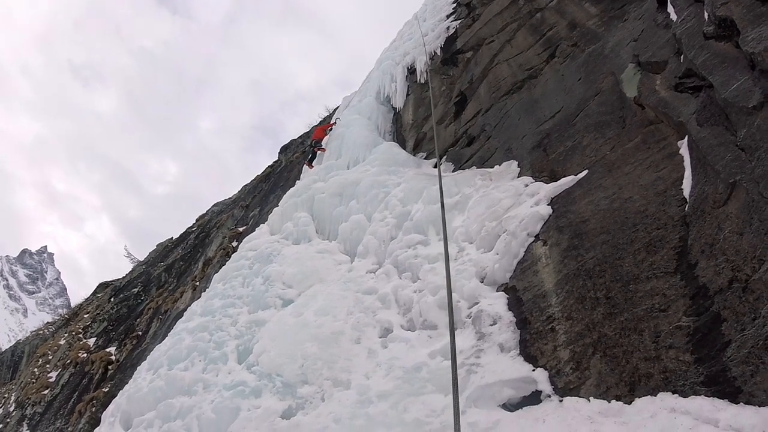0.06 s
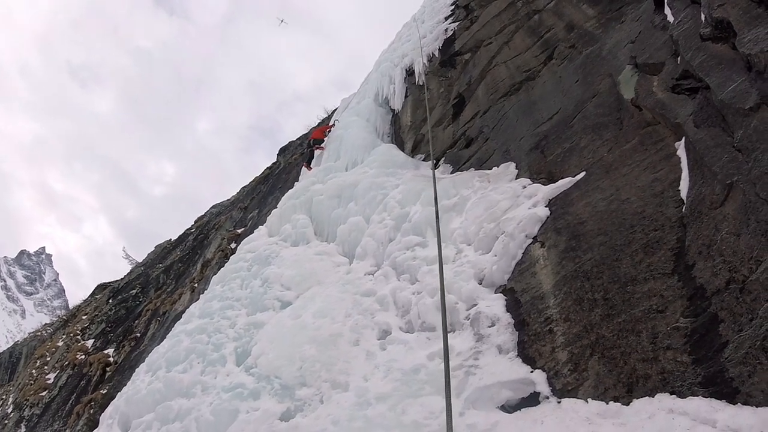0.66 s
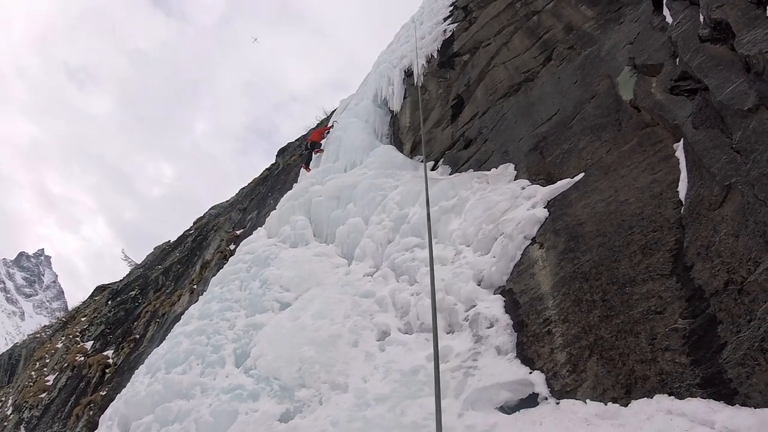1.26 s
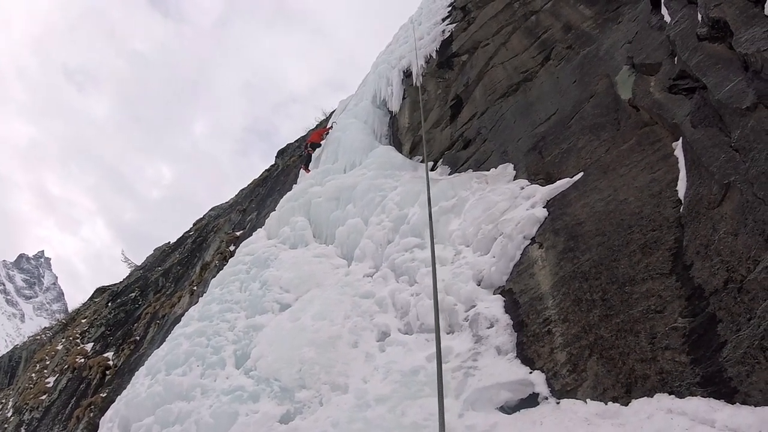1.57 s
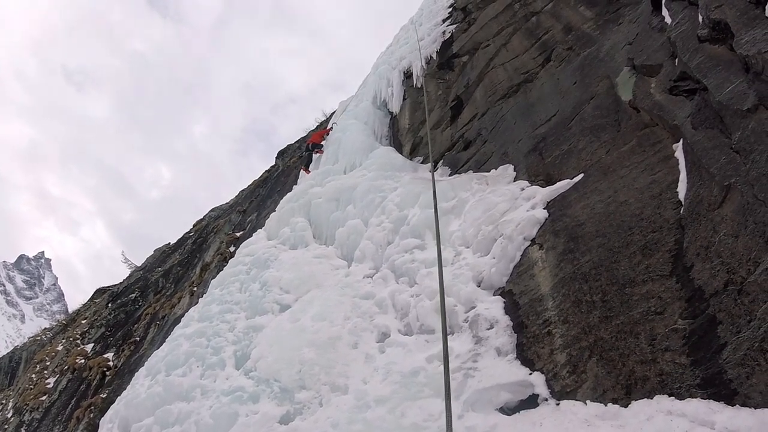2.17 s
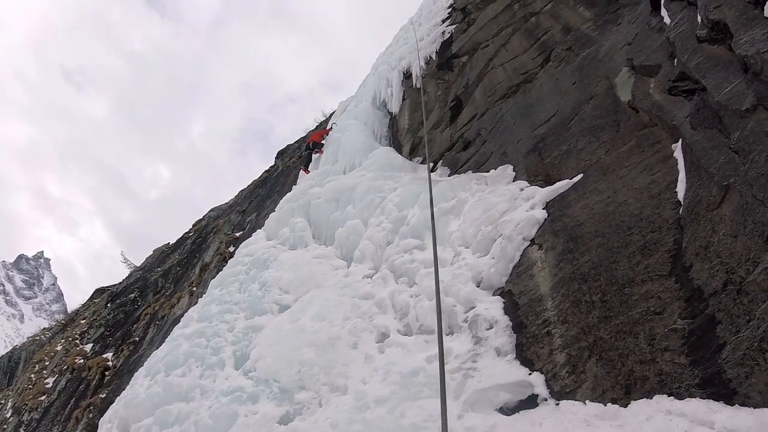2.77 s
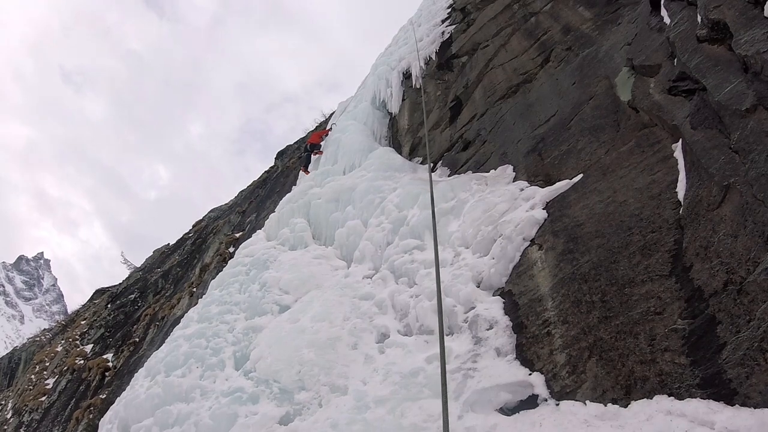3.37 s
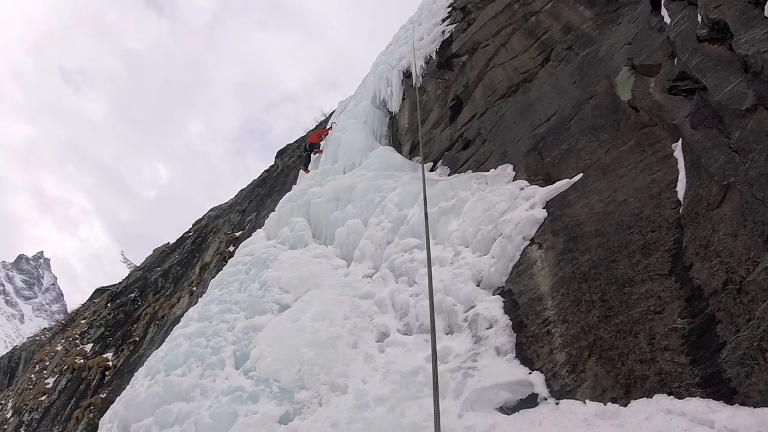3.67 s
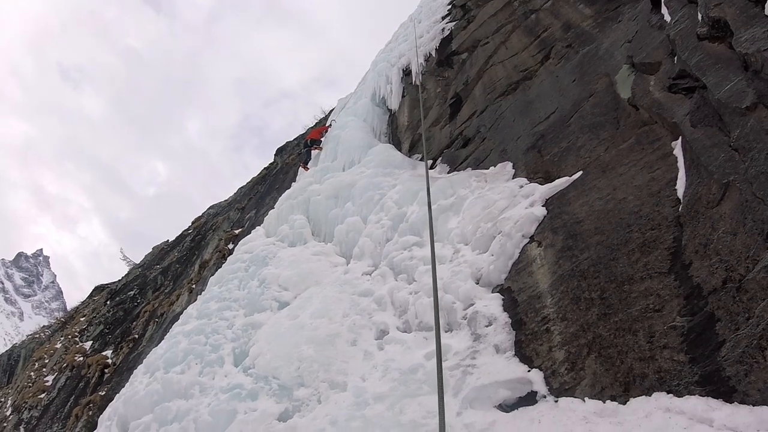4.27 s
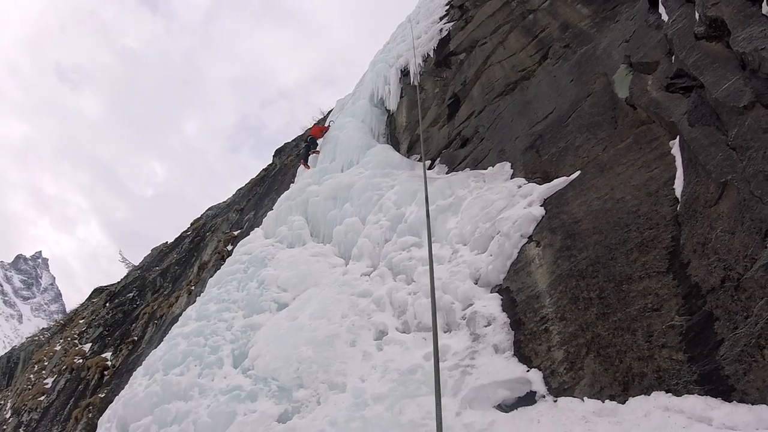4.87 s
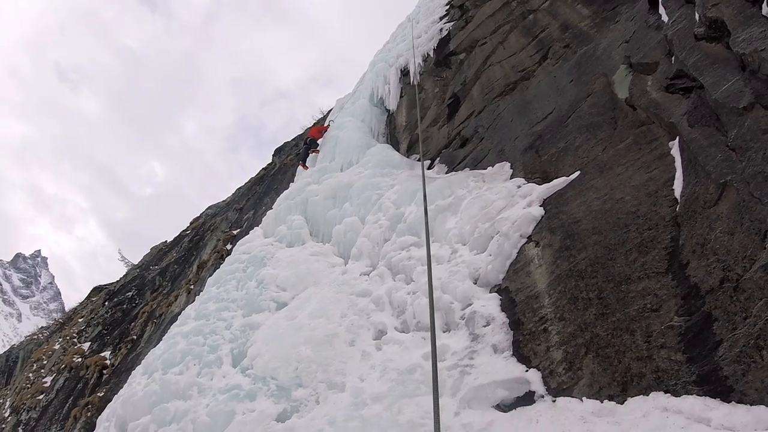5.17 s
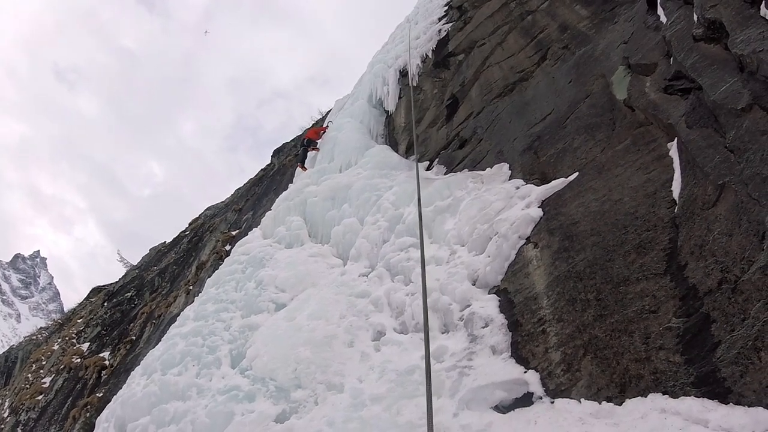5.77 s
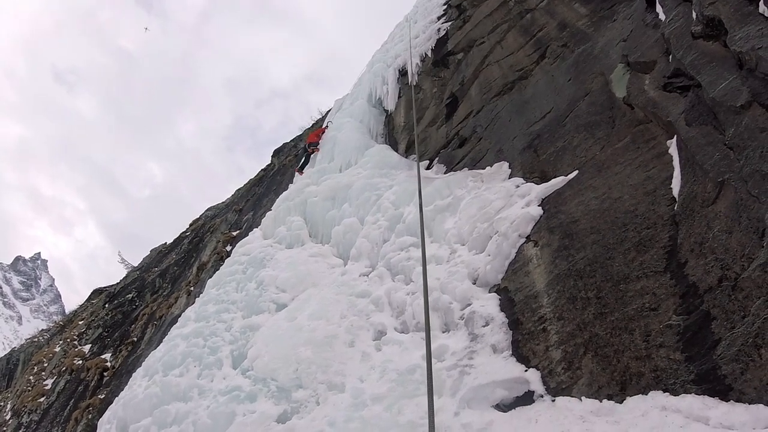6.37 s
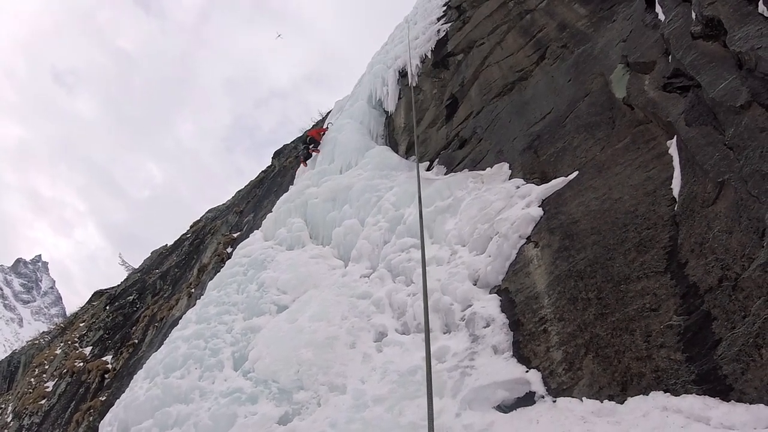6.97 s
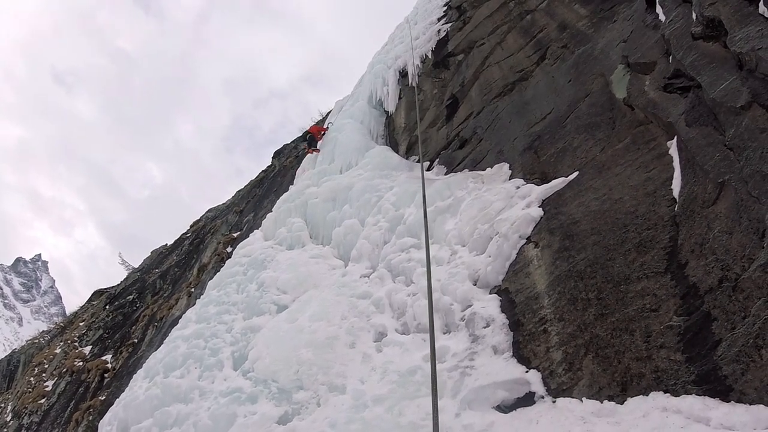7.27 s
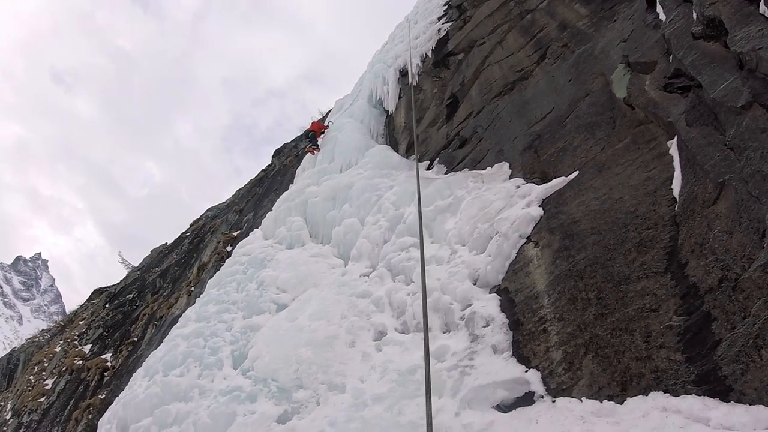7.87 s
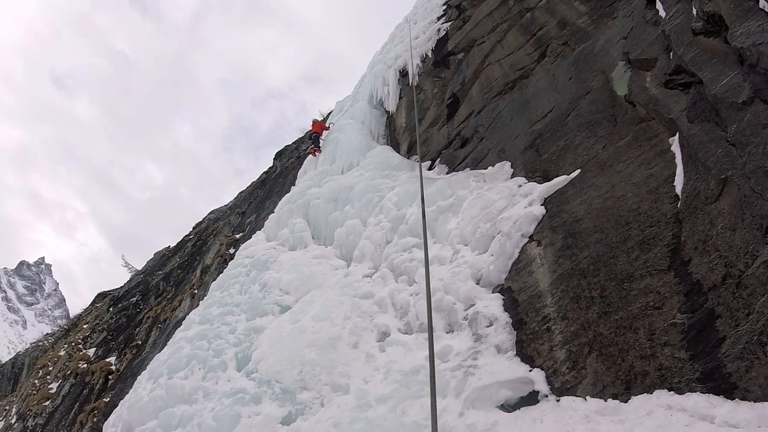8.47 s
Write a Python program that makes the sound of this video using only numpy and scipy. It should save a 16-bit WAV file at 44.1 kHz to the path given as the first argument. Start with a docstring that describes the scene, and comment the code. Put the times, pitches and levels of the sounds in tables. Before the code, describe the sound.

A climber's pick cracks into ice and crampons scrape, while falling chips tick and thump near the microphone in a soft rush of air.

```python
"""Foot of a frozen waterfall, heard by a small camera; an ice climber works high above.
Axe picks shatter into the ice, crampons kick and scrape: dense tiny cracks ring, boom the column
and spray splinters. The rock wall answers briefly. Loose chips and grains tick on the camera,
soft lumps thud beside it. Cold air rushes steadily."""
import sys
import numpy as np
from scipy import signal
from scipy.fft import rfft, irfft, next_fast_len
from scipy.io import wavfile
from scipy.ndimage import uniform_filter1d

SR = 44100
rng = np.random.default_rng(int(sys.argv[2]) if len(sys.argv) > 2 else 0)


def log_audio(samples):
    """Write samples as a 16-bit WAV file to the path given in sys.argv[1]."""
    # one column per channel
    frames = np.atleast_2d(samples).T
    # limit to full scale, then quantise
    limited = np.clip(frames, -1, 1)
    pcm = np.round(limited * 32767).astype(np.int16)
    wavfile.write(sys.argv[1], SR, pcm)


N = 384111
EVENT_T = np.arange(SR // 4) / SR  # time axis of one impact, s


def undb(db):
    """Decibels to gain."""
    return 10 ** (np.asarray(db) / 20)


def unit(x):
    """Scale to rms 1."""
    return x / np.sqrt(np.mean(x ** 2))


def add(track, start_s, sound):
    """Mix a sound into the track."""
    start = max(int(start_s * SR), 0)
    part = sound[:max(N - start, 0)]
    track[start:start + len(part)] += part


def colour(x, points):
    """Minimum-phase filter through (f/Hz, gain/dB) points."""
    hz, db = np.transpose(points)
    size = 2 * next_fast_len(len(x))
    log_hz = np.log(np.fft.rfftfreq(size, 1 / SR) + 1)
    gain = undb(np.interp(log_hz, np.log(hz), db))
    cepstrum = irfft(np.log(gain))
    cepstrum[1:size // 2] *= 2
    cepstrum[size // 2 + 1:] = 0
    return irfft(rfft(x, size) * np.exp(rfft(cepstrum)))[:len(x)]


def resonate(x, modes, pitch_ratio=1):
    """Driven modes (f/Hz, width/Hz, level/dB); a second, broad filter steepens the skirts."""
    out = 0
    for hz, width_hz, db in modes:
        mode = signal.lfilter(*signal.iirpeak(hz * pitch_ratio, hz / width_hz, fs=SR), x)
        mode = signal.lfilter(*signal.iirpeak(hz * pitch_ratio, Q=1.6, fs=SR), mode)
        out = out + undb(db) * unit(mode)
    return out


def ring(modes, contact_s):
    """Free ring after one tap, peak 1; longer contact dulls the click."""
    out = 0
    for hz, t60_s, db in modes:
        detuned_hz = hz * (1 + 0.015 * rng.standard_normal())
        out = out + undb(db - 60 * EVENT_T / t60_s) * np.sin(2 * np.pi * detuned_hz * EVENT_T)
    out *= 1 - np.exp(-EVENT_T / contact_s)
    return out / np.abs(out).max()


def thud(hz, swell_s, softness):
    """A soft push swings a heavy body for a few cycles."""
    u = EVENT_T / swell_s
    envelope = (u * np.exp(1 - u)) ** softness
    return -envelope * np.sin(2 * np.pi * hz * EVENT_T)


def wander(rate_hz):
    """Smooth random drift, rms 1."""
    hold = int(SR / rate_hz)
    steps = np.repeat(rng.standard_normal(N // hold + 1), hold)
    return unit(uniform_filter1d(uniform_filter1d(steps, hold), hold)[:N])


# breeze strength: t/s, level/dB
BREEZE_LEVELS = [(0.0, -57), (0.51, -56), (0.97, -53), (3.08, -53), (3.93, -55.5), (4.38, -53), (8.7, -53)]
# rush spectrum: f/Hz, gain/dB
RUSH_SPECTRUM = [(76, -15), (130, -7), (151, 1), (205, -3), (310, -7.5), (365, -9), (497, -11), (964, -15),
                 (1120, -16.5), (1410, -17), (2870, -25.5), (4400, -39), (5720, -77), (9680, -120)]
# hiss spectrum: f/Hz, gain/dB
HISS_SPECTRUM = [(3500, -22), (4400, -18.5), (5200, -7), (5800, -11), (6400, -0.5), (8000, -1), (10000, -4),
                 (11500, -9.5), (15000, -15)]


def air(rush_db=0.5, hiss_db=-10.5, flutter_db=1.0):
    """Low fluttering rush over smooth hiss; both follow the breeze."""
    breeze_db = np.interp(np.arange(N) / SR, *np.transpose(BREEZE_LEVELS))
    rush = np.zeros(N)
    for _ in range(2):
        stream = unit(colour(rng.standard_normal(N), RUSH_SPECTRUM))
        rush += stream * undb(flutter_db * wander(rate_hz=9))
    hiss = unit(colour(rng.standard_normal(N), HISS_SPECTRUM))
    return undb(breeze_db + rush_db) * unit(rush) + undb(breeze_db + hiss_db) * hiss


# bright modes of the camera housing: f/Hz, t60/s, level/dB
HOUSING_TICK = [(3100, 0.0029, -12), (5080, 0.0083, -1), (5380, 0.01, -3.5), (7440, 0.0042, 0.5),
                (9300, 0.0026, -5)]


def spindrift(base_per_s=9, shower_per_s=100, delay_s=0.13, width_s=0.062, max_db=-54.5):
    """Fine ice grains patter on the housing, thicker just after each axe blow."""
    t = np.arange(N) / SR
    showers = sum(np.exp(-((t - blow_s - delay_s) / width_s) ** 2) for blow_s, *_ in AXE_BLOWS)
    arrivals = rng.random(N) < (base_per_s + shower_per_s * showers) / SR
    grains = arrivals * undb(max_db) * rng.random(N)
    return signal.fftconvolve(grains, ring(HOUSING_TICK, contact_s=0.00069))[:N]


# dull modes of the camera housing: f/Hz, t60/s, level/dB
HOUSING_KNOCK = [(495, 0.017, -3), (950, 0.017, -4), (1136, .008, 4.5), (1470, 0.0089, 0),
                 (2170, 0.0067, -10)]
# chips hitting the camera: t/s, tick/dB, knock/dB
CHIP_HITS = [(1.5500, -52, -70), (2.5200, -46, -70), (2.9600, -49, -70), (3.4550, -50, -70),
             (4.8458, -41, -52), (5.51, -46, -43), (5.5376, -50, -43), (5.739, -43, -57), (6.465, -47, -66),
             (7.032, -37.5, -62), (7.5257, -39, -13), (7.5365, -28, -18.5), (7.5465, -35, -22.5),
             (7.5770, -44, -34.5), (7.6745, -44, -40), (7.7107, -50, -35.5), (8.3472, -46, -70)]


def chips():
    """Hard chips tick on the housing; heavy ones knock it and rock the mount."""
    out = np.zeros(N)
    for start_s, tick_db, knock_db in CHIP_HITS:
        mount_db = 1.53 * knock_db - 1.5
        add(out, start_s, undb(tick_db) * ring(HOUSING_TICK, contact_s=0.00031))
        add(out, start_s, undb(knock_db) * ring(HOUSING_KNOCK, contact_s=0.00015))
        add(out, start_s, undb(mount_db) * thud(hz=212, swell_s=0.0023, softness=1.1))
    return out


# lumps landing beside the camera: t/s, level/dB, f/Hz
LUMP_FALLS = [(6.2417, -24, 205), (6.536, -26.5, 202), (7.63, -37, 236), (8.1956, -4, 204)]


def lumps():
    """Soft lumps land close by: a thud, a slower and deeper sway, a faint knock at contact."""
    out = np.zeros(N)
    for start_s, db, hz in LUMP_FALLS:
        add(out, start_s, undb(db) * thud(hz, swell_s=0.004, softness=2.2))
        add(out, start_s, undb(db - 19.5) * thud(hz=168, swell_s=0.011, softness=2.1))
        add(out, start_s, undb(db - 32.5) * ring(HOUSING_KNOCK, contact_s=0.0017))
    return out


def rock_wall(x, wet_db, decay_s, cutoff_hz):
    """Direct sound plus a short, duller tail scattered by the overhang."""
    envelope = np.exp(-EVENT_T / decay_s) * (1 - np.exp(-EVENT_T / 0.0029))
    scatter = rng.standard_normal(len(EVENT_T)) * envelope
    scatter = signal.lfilter(*signal.butter(1, cutoff_hz, fs=SR), scatter / np.linalg.norm(scatter))
    return x + undb(wet_db) * signal.fftconvolve(x, scatter)[:N]


def stroke(swell_s, decay_s, release_at_s=None):
    """Envelope: linear swell, optional hold, exponential decay."""
    released_s = np.maximum(EVENT_T - (release_at_s or swell_s), 0)
    return np.minimum(EVENT_T / swell_s, 1) * np.exp(-released_s / decay_s)


# hollow boom of the ice column: f/Hz, gain/dB
BOOM_SPECTRUM = [(100, -7), (180, -1.5), (290, -1.5), (390, 0), (520, -5), (850, -7), (1080, -16),
                 (1600, -9.5), (4000, -51)]
# splinter spray: f/Hz, gain/dB
SPLINTER_SPECTRUM = [(900, -53), (2400, -15), (3400, 0.5), (4300, 0), (5150, 12), (5450, 11), (5850, -3.5),
                     (6600, 9), (7800, 10.5), (8800, 1.5), (10200, 5), (11800, -17), (13500, -13),
                     (15000, -27)]
NOMINAL_RING_HZ = 1660


def crunch(envelope, modes, ring_hz, cracks_per_s, spread_db, ring_db, boom_db, thunk_db, splinter_db):
    """Steel breaks ice: uneven cracks ring, boom and spray splinters; the push thunks the column."""
    n = len(envelope)
    cracks = envelope * (rng.random(n) < cracks_per_s / SR) * rng.choice([-1, 1], n)
    cracks *= undb(spread_db * rng.standard_normal(n))
    ringing = undb(ring_db) * unit(resonate(cracks, modes, ring_hz / NOMINAL_RING_HZ))
    boom = undb(boom_db) * unit(colour(cracks, BOOM_SPECTRUM))
    thunk = undb(boom_db + thunk_db) * unit(thud(hz=308, swell_s=0.012, softness=7.1))
    splinters = undb(splinter_db) * unit(colour(cracks, SPLINTER_SPECTRUM))
    return np.sqrt(np.mean(envelope ** 2)) * (ringing + boom + thunk + splinters)


# ice modes under crampon points, at nominal pitch: f/Hz, width/Hz, level/dB
CRAMPON_RING = [(1460, 160, -17), (1585, 116, 4.5), (1717, 135, 3.5), (1900, 340, -2.5), (2456, 110, -7),
                (3130, 490, -22)]
# kicks: t/s, swell/s, level/dB, splinters/dB re level, ring/Hz
CRAMPON_KICKS = [(0.846, .001, -45.5, -24, 1640), (1.3490, .004, -50.5, -10, 1690),
                 (1.4590, 0.0064, -47.5, -14, 1700), (4.2211, 0.00092, -46, -28, 1630),
                 (4.4510, .001, -40.5, -30, 1620), (4.5410, 0.0068, -34, -8, 1490),
                 (4.5841, 0.0049, -34.5, -12, 1870), (4.8638, .001, -41, -11.5, 1710),
                 (4.9560, 0.0063, -43.5, -11.5, 1630), (5.9287, .004, -26, -13, 1585),
                 (5.9923, .002, -33, -16, 1750), (6.1660, 0.0062, -34.5, -12, 1610),
                 (6.1820, 0.0043, -41.5, -12, 1630), (6.2250, .006, -47, -22, 1740),
                 (6.2648, .0007, -31.5, -18, 1630)]
# scrapes: t/s, length/s, level/dB, splinters/dB re level, ring/Hz
CRAMPON_SCRAPES = [(0.857, 0.043, -58, -9, 1730), (4.468, 0.031, -33, -14, 1556),
                   (4.508, 0.045, -38.5, -15, 1620), (4.565, 0.044, -53.5, -5.5, 1740),
                   (4.604, 0.033, -40, -8, 1730), (5.048, 0.021, -52, -11.5, 1640),
                   (5.909, 0.029, -40, -14.5, 1590), (5.975, 0.052, -41, -14.5, 1610)]


def crampons(usual_db=-44):
    """Steel points kick into the ice or drag across it."""
    out = np.zeros(N)
    kicks = [(start_s, stroke(swell_s, decay_s=0.0056), *rest)
             for start_s, swell_s, *rest in CRAMPON_KICKS]
    scrapes = [(start_s, stroke(swell_s=0.01, decay_s=0.0093, release_at_s=length_s), *rest)
               for start_s, length_s, *rest in CRAMPON_SCRAPES]
    for start_s, envelope, db, splinter_db, ring_hz in kicks + scrapes:
        boom_db = -5.5 - 0.33 * (db - usual_db)  # set by boot weight: varies less than the crunch
        sound = crunch(envelope, CRAMPON_RING, ring_hz, cracks_per_s=14000, spread_db=6,
                       ring_db=-0.43, boom_db=boom_db, thunk_db=-30, splinter_db=splinter_db)
        add(out, start_s, undb(db) * sound)
    return out


# ice modes under a pick, at nominal pitch: f/Hz, width/Hz, level/dB
PICK_RING = [(1520, 79, -20), (1527, 260, 10), (1766, 160, 4.5), (1946, 69, -3), (2436, 67, -1.5),
             (2870, 460, -40)]
# blows: t/s, level/dB, boom/dB, splinters/dB, ring/Hz, break delay/s, break/dB
# (boom, splinters and break re level)
AXE_BLOWS = [(0.7281, -33.5, -3, -2.5, 1630, 0.012, -1), (1.789, -27.5, 1.5, -5.5, 1620, 0.0096, -2.5),
             (4.087, -30, .5, -4, 1586, .0125, -7), (5.7663, -25.5, 1, -2.5, 1750, .005, -11),
             (7.3590, -31.5, -4.5, -8, 1720, 0.015, -9.5)]


def axes():
    """The pick bites; a moment later the ice around it breaks with a hollower boom."""
    out = np.zeros(N)
    bite = stroke(swell_s=0.0036, decay_s=0.0063)
    breaking = stroke(swell_s=0.0029, decay_s=0.0066)
    for blow_s, db, boom_db, splinter_db, ring_hz, delay_s, break_db in AXE_BLOWS:
        stages = [(blow_s, bite, db, boom_db),
                  (blow_s + delay_s, breaking, db + break_db, boom_db + 2)]
        for start_s, envelope, stage_db, stage_boom_db in stages:
            sound = crunch(envelope, PICK_RING, ring_hz, cracks_per_s=22000, spread_db=2,
                           ring_db=3, boom_db=stage_boom_db, thunk_db=-7.5, splinter_db=splinter_db)
            add(out, start_s, undb(stage_db) * sound)
    return out


def scene():
    """Mono mix at the foot of the icefall."""
    blows = rock_wall(axes(), wet_db=-13, decay_s=0.028, cutoff_hz=5000)
    footwork = rock_wall(crampons(), wet_db=-19, decay_s=0.021, cutoff_hz=7000)
    return (blows + footwork + lumps() + chips() + spindrift() + air())[None]


def record(dry):
    """Camera: the wind filter cuts deep bass, the electronics hum faintly, the top is cut."""
    low_cut_hz, top_hz = 133.3, 15250
    f_ratio = np.fft.rfftfreq(N, 1 / SR) / low_cut_hz
    bass_leak = undb(-21) * np.minimum(f_ratio, 1)
    wind_filter = np.maximum(1 - 1 / (1 + f_ratio ** 22), bass_leak)
    hum = resonate(rng.standard_normal(N), modes=[(52.25, 23.75, -79.5)])
    sound = irfft(rfft(dry) * wind_filter, N) + hum
    return signal.sosfilt(signal.ellip(10, 0.2, 70, top_hz, fs=SR, output="sos"), sound)


dry = scene()
out = record(dry)
log_audio(out)
```